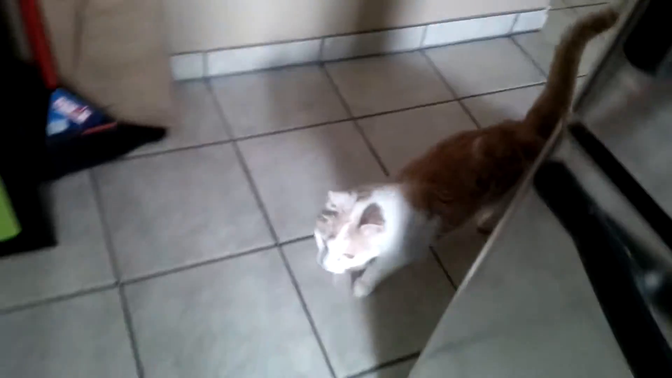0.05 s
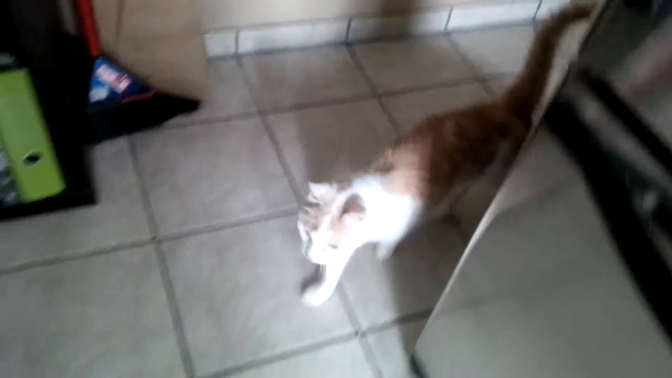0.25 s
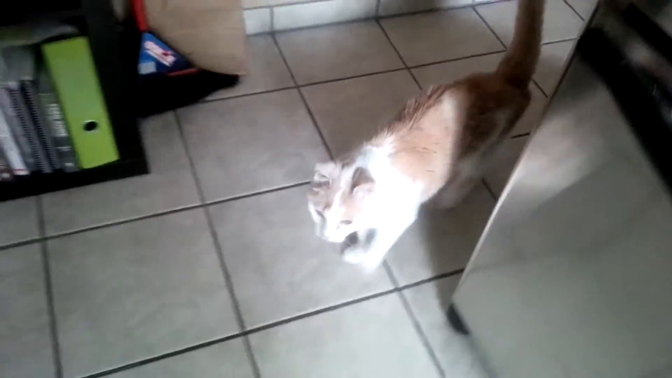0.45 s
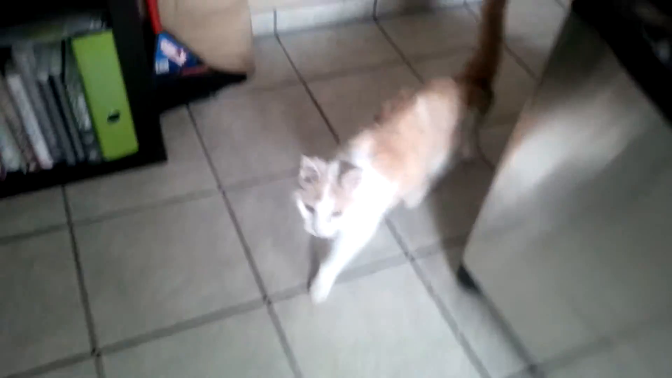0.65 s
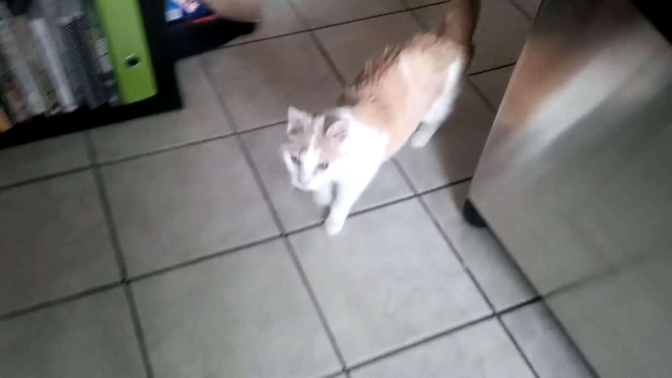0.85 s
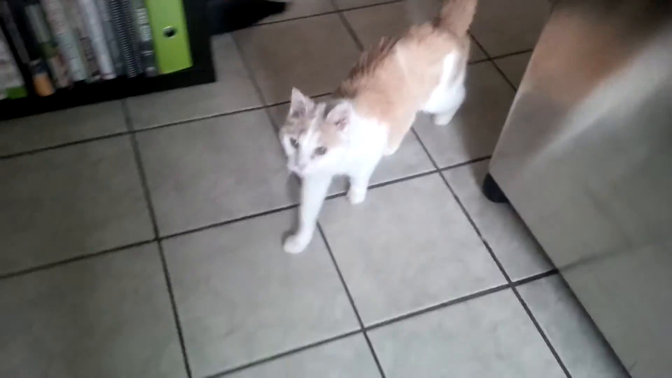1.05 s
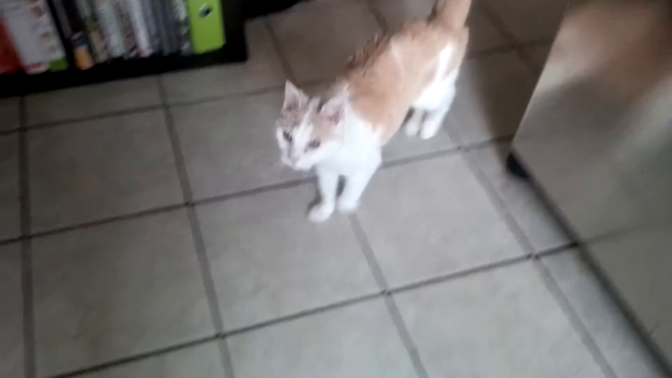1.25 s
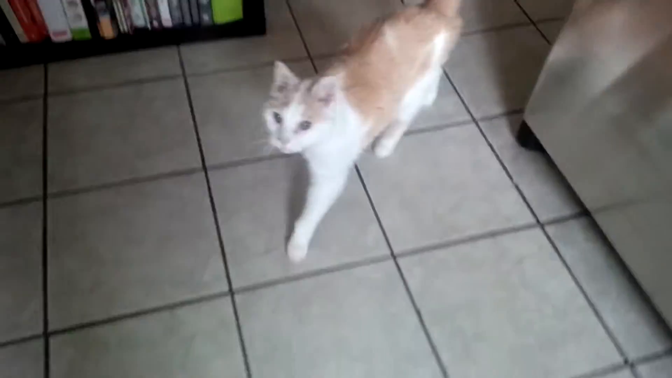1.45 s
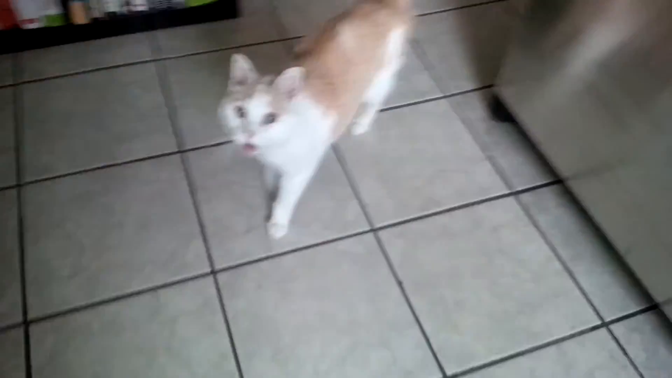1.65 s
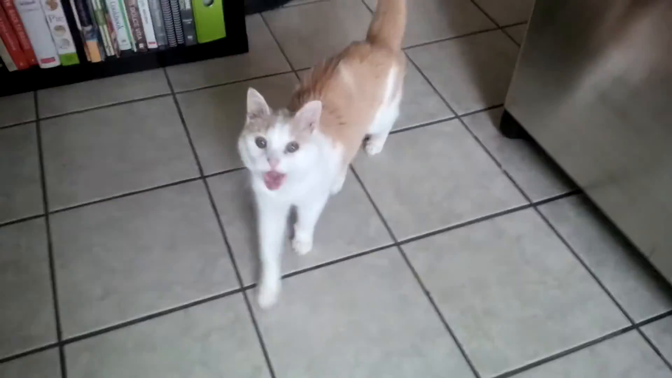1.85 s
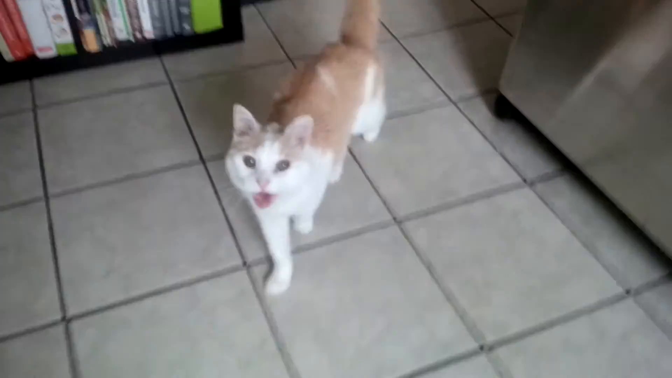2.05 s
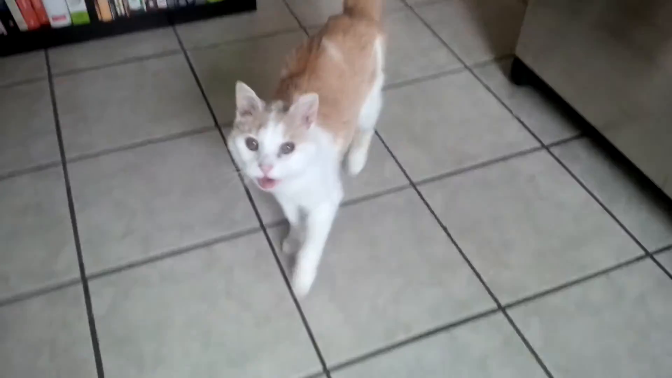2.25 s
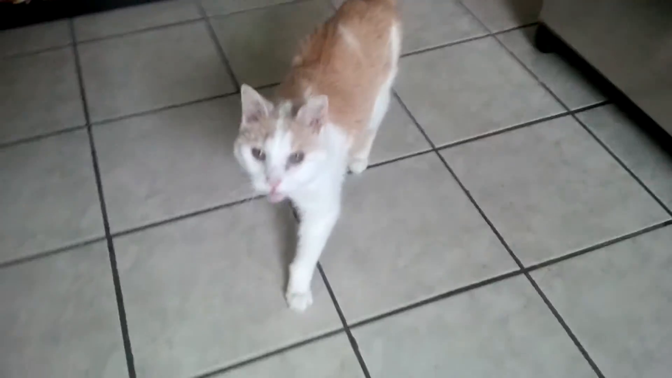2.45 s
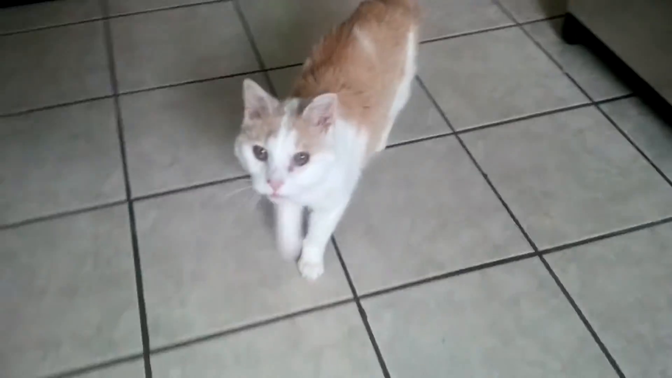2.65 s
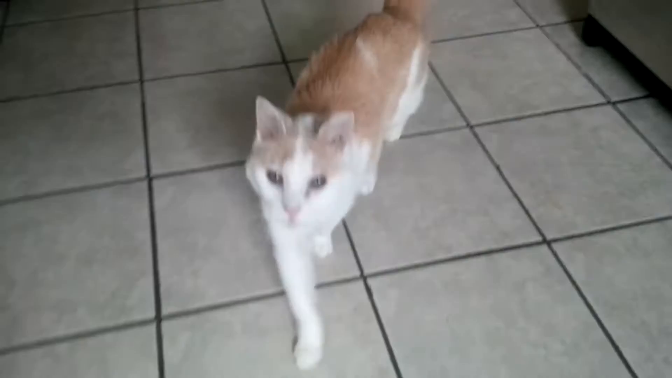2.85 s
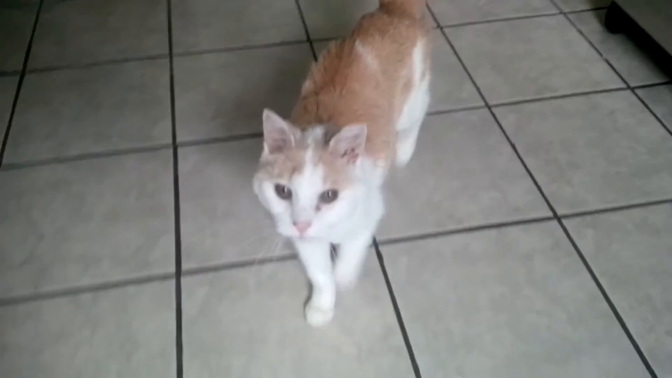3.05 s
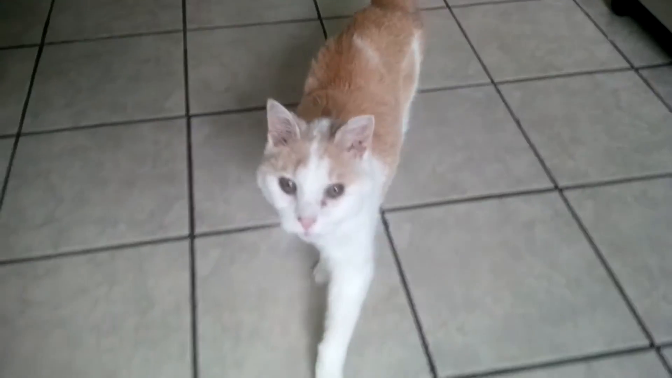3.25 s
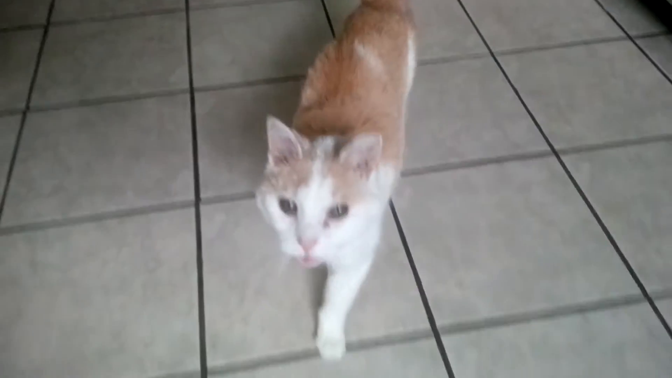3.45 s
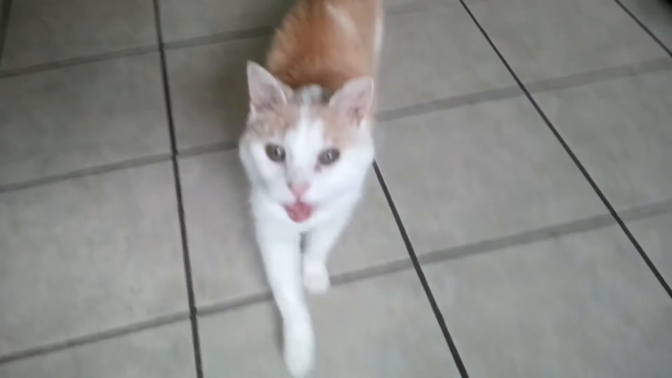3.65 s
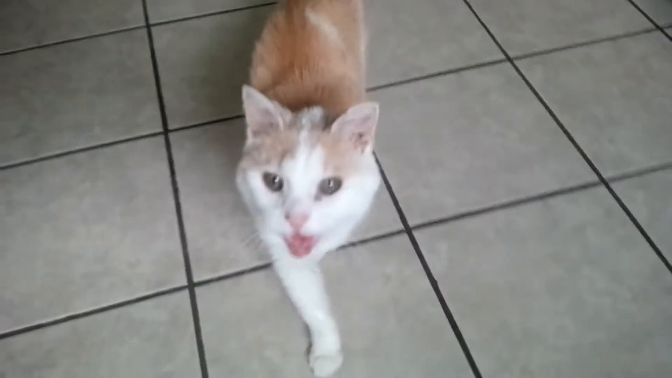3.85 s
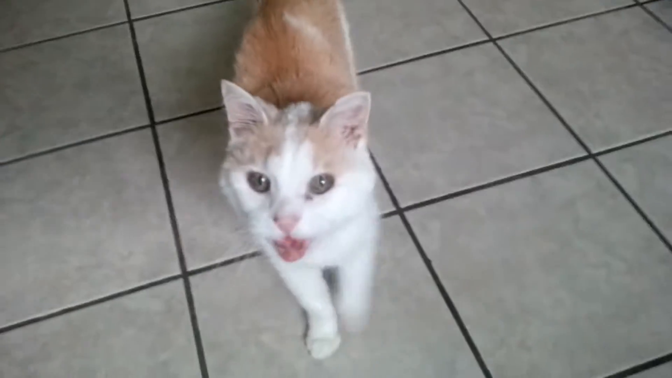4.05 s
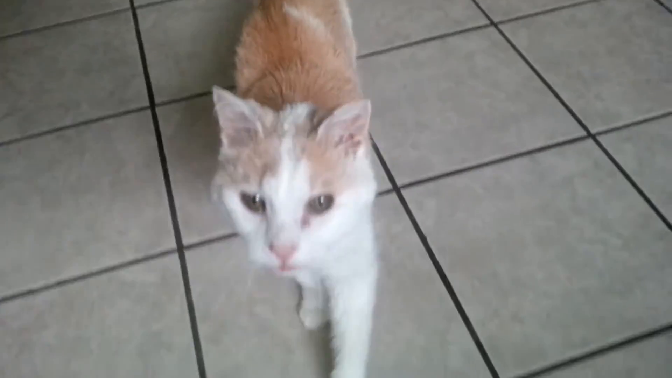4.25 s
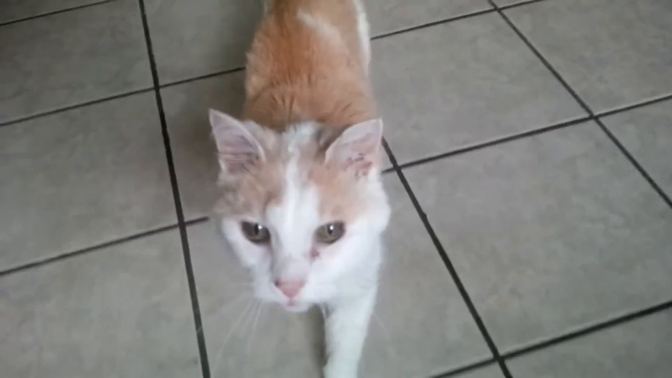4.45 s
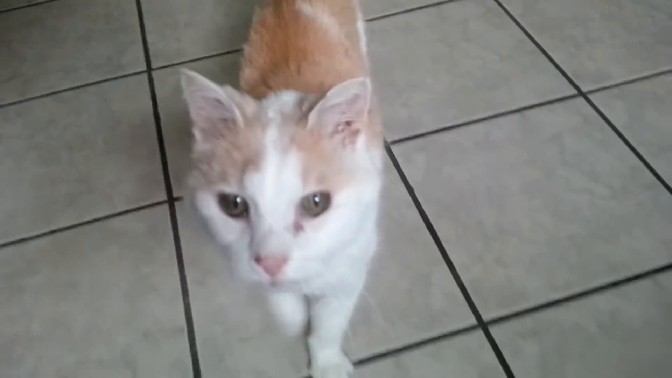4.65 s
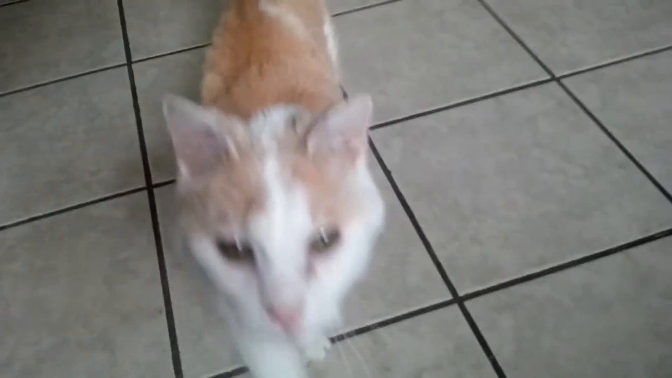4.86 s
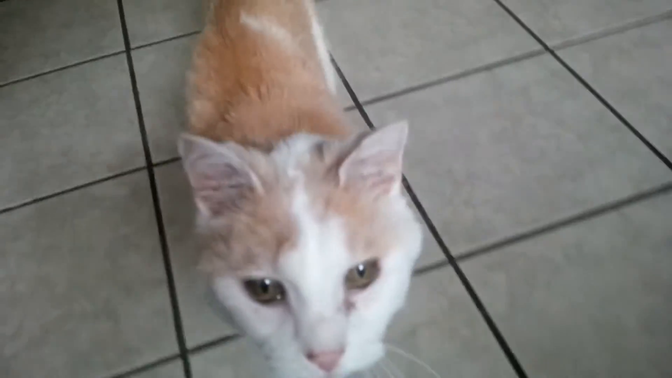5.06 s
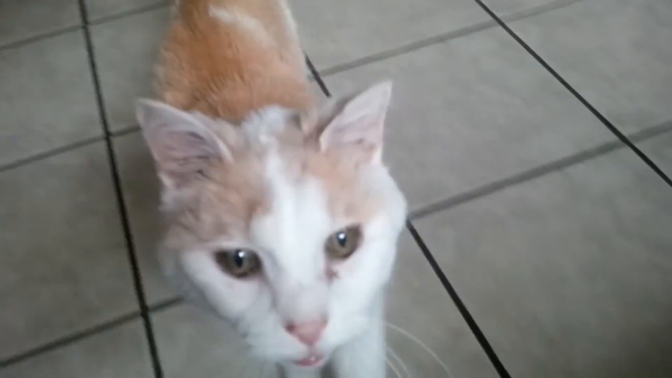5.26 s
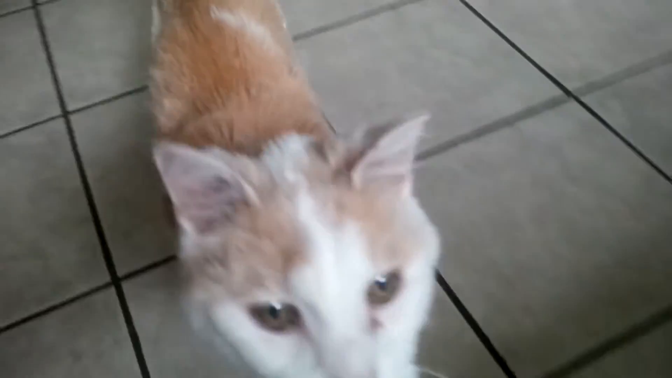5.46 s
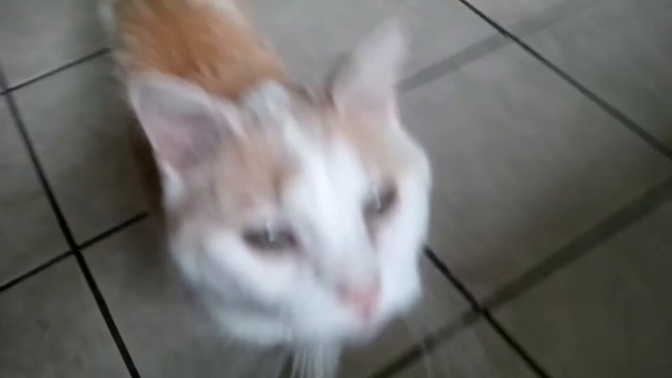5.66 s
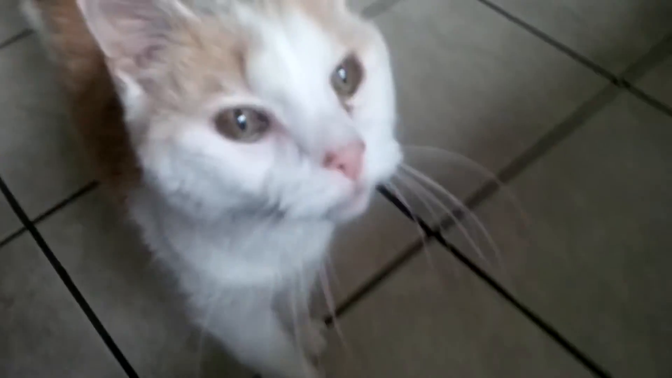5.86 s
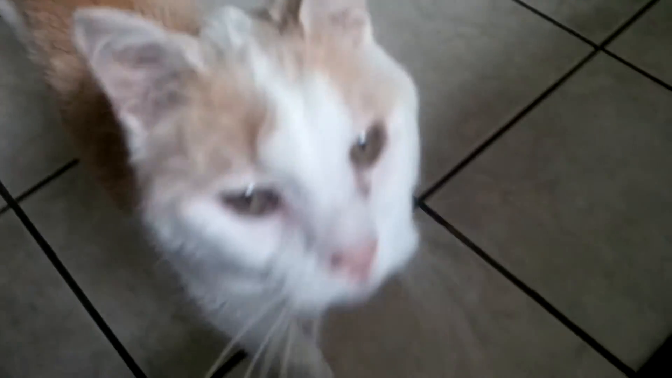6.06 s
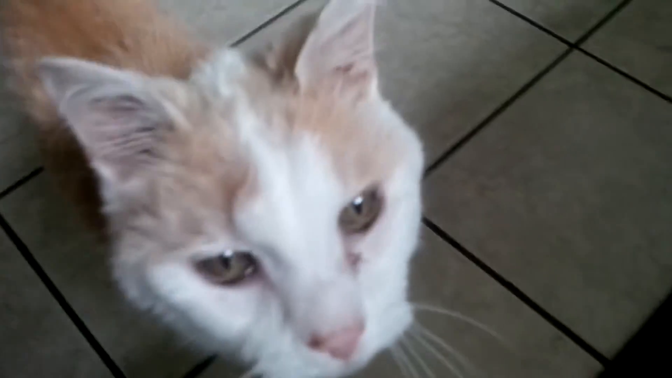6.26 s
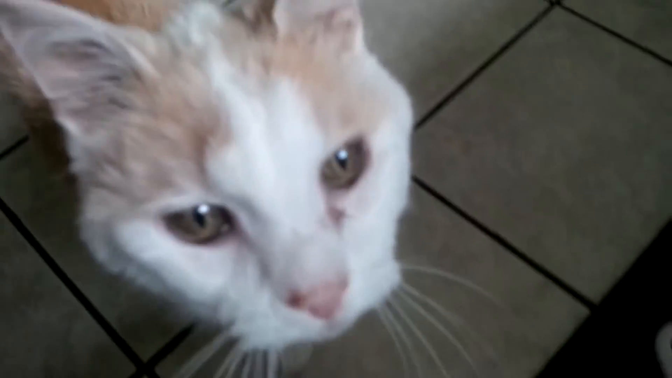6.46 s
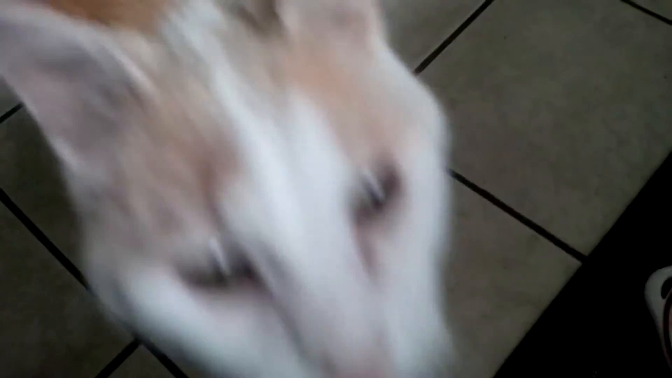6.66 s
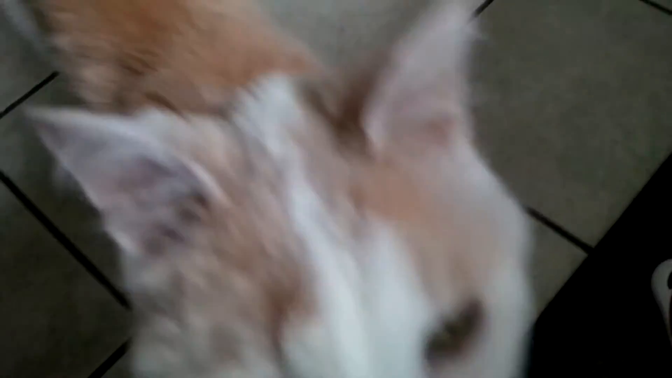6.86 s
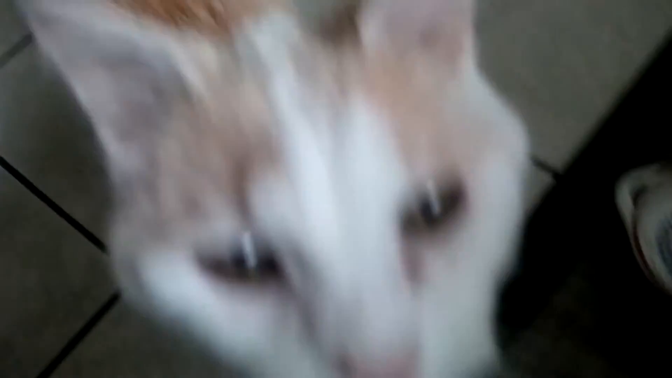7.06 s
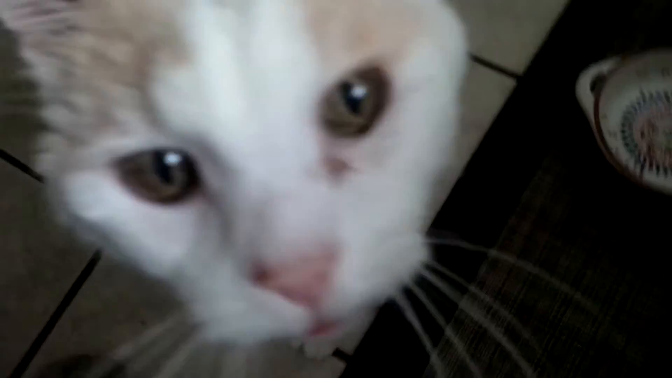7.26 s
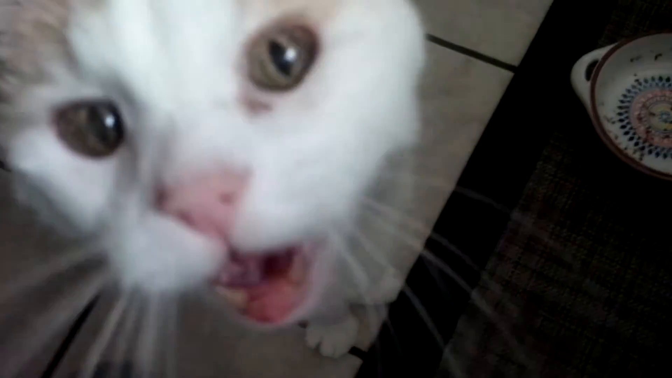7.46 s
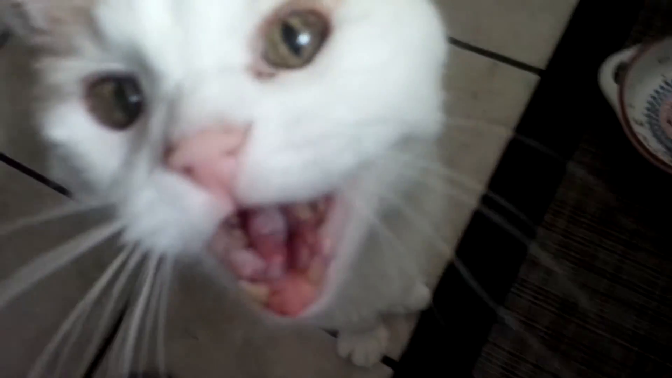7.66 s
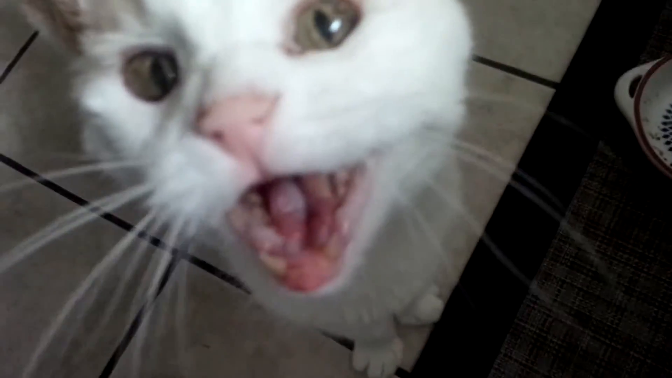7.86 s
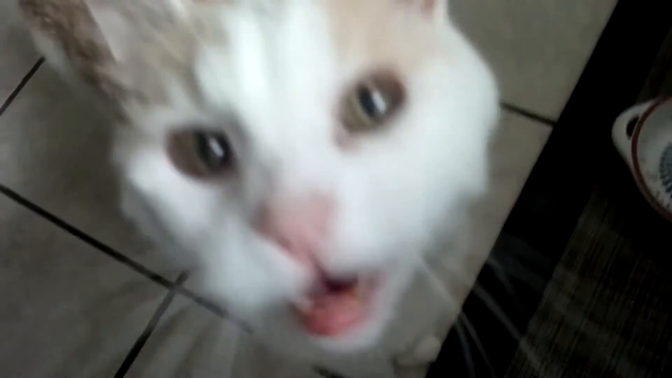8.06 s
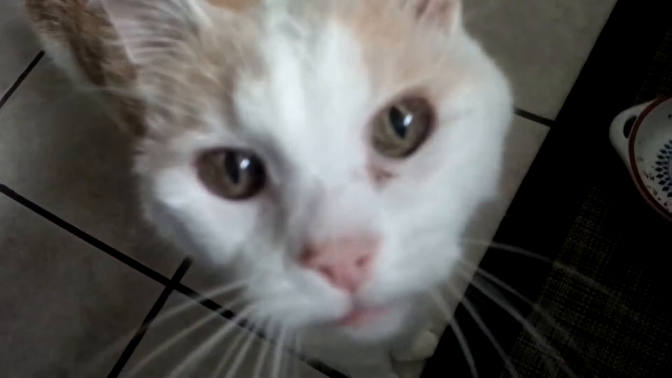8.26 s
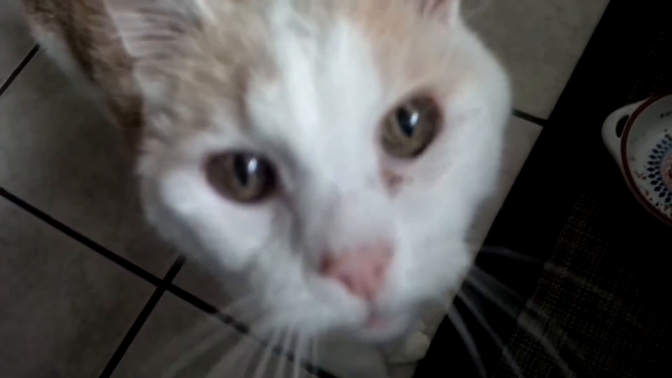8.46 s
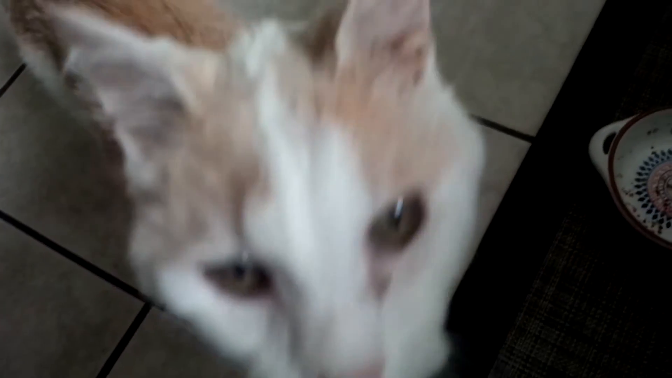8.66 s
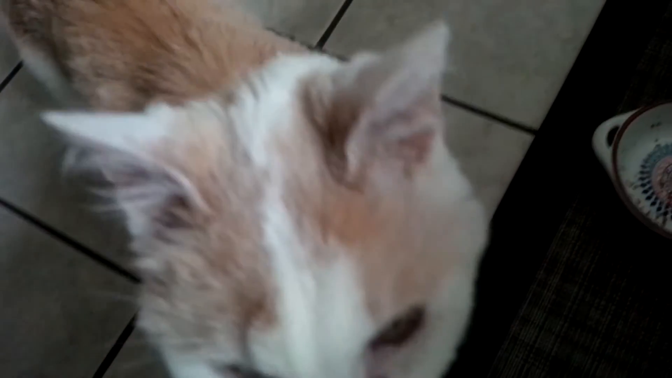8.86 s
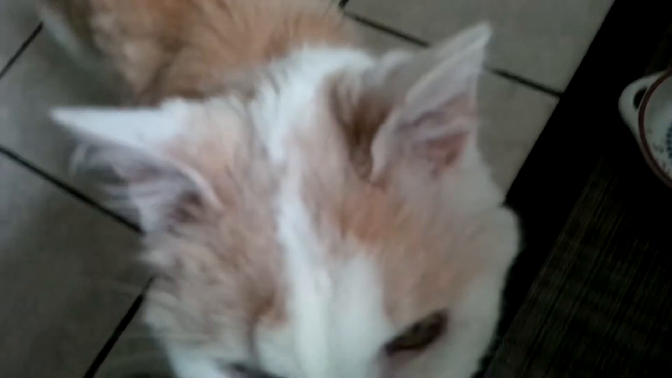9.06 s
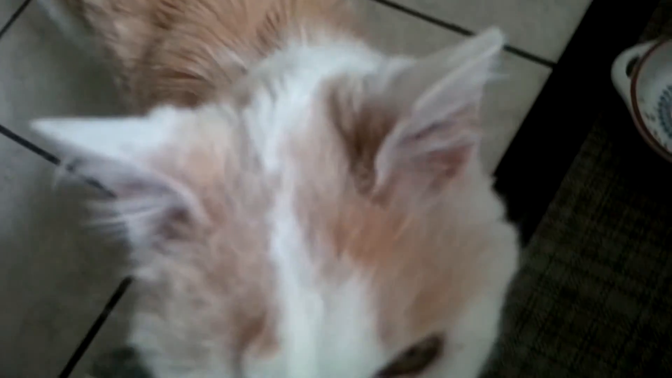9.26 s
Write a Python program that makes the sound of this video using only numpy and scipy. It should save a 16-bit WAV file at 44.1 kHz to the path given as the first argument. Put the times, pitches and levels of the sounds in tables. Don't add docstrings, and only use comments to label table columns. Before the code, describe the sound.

In a small, hard tiled room, a joint creaks in dry, sticking jerks for over a second. An old cat then meows five times, approaching from across the floor to right at the hand-held microphones. Each call begins as a gravelly closed-mouth trill and opens into a clearer tone; the last breaks off. Finger taps, scuffs, clicks and faint air hisses come between.

```python
import sys
import numpy as np
from scipy import signal
from scipy.fft import rfft, irfft, next_fast_len
from scipy.io import wavfile
from scipy.ndimage import map_coordinates

SR = 44100
rng = np.random.default_rng(int(sys.argv[2]) if len(sys.argv) > 2 else 0)


def wav_out(sig):
    wavfile.write(sys.argv[1], SR, np.round(np.clip(np.atleast_2d(sig).T, -1, 1) * 32767).astype(np.int16))


def invert_db(x):
    u = np.asarray(x, float) / 20
    return 10 ** u


N = 411012

# freq_hz, density_db
ROOM_TONE = [(15, -2.5), (35, -6), (80, -2), (140, -10), (250, -9.5), (500, -17), (1000, -19.5),
             (2000, -25), (4000, -32), (8000, -38.5), (12000, -42), (15000, -49)]
# freq_hz, likeness
PORT_LIKENESS = [(60, 0.87), (130, 0.94), (270, 0.69), (580, 0.41), (1220, 0.11), (2600, 0.05)]
# freq_hz, left_minus_right_db
HAND_SHADE = [(60, 4.5), (140, -14), (320, -3.5), (740, -7), (1130, -11), (1710, -17.5), (2600, -12),
              (4500, -9.5), (8000, -2.5), (13000, 1)]
# freq_hz, density_db
SHAKE_COLOUR = [(10, -15), (25, 8), (70, -10), (110, -3), (200, -54)]
# peak_s, rise_s, fall_s, level_db
HAND_JOLTS = [
    (0, .1, 0.41, -50.5),
    (0.521, 0.18, 2.3, -49.5),
    (3.24, .25, 1.5, -58.5),
    (4.26, 0.22, .15, -51),
    (5.298, 3.5, 1.1, -64.5),
    (7.202, 2.3, 0.44, -51.5),
]
# freq_hz, t60_s
TILE_DECAY = [(200, 0.16), (1500, 0.3), (3000, 0.38), (6000, 0.13), (12000, 0.031)]

# peak_s, rise_s, fall_s, body_db, rasp_over_body_db
SCUFFS = [(2.49, .05, 0.14, -47.5, -14.5), (1.47, .06, .15, -58, -7.5), (2.816, 0.0065, 0.046, -51, -2.5),
          (2.855, 0.036, 0.039, -56.5, -0.5), (2.899, 0.049, .12, -68, -9), (3.11, 0.11, 0.24, -58.5, -12),
          (4.21, 0.016, .06, -37, -10.5), (4.234, 0.021, .05, -46.5, -19), (4.4, 0.41, 0.16, -55.5, -10.5),
          (4.799, .3, .22, -52.5, -14), (5.57, 0.014, 0.055, -56.5, -8), (5.634, 0.022, 0.072, -48, -14),
          (6.999, 0.062, 0.096, -62.5, -12), (8.099, 0.017, 0.074, -36, -5.5),
          (8.154, 0.063, 0.043, -47, 1.5)]
# freq_hz, density_db
SCUFF_BODY = [(100, -27.5), (200, 1), (600, -0.5), (1500, -2.5), (2500, -8), (3500, -39)]
# freq_hz, density_db
SCUFF_RASP = [(1800, -27), (2800, 7.5), (3600, -3), (4600, 1), (5600, -7.5), (6500, -18.5), (8000, -35)]
# peak_s, rise_s, fall_s, level_db, centre_hz
HISSES = [(2.856, 0.049, 0.041, -59.5, 9600), (8.15, .03, .04, -49, 10700), (8.163, .03, .03, -49.5, 15000),
          (8.1, 0.05, 0.1, -58.5, 7400), (7.633, .02, .02, -51, 5400), (7.667, 0.016, .02, -47, 3100),
          (7.697, .015, .015, -56, 5200), (7.755, .015, .02, -50.5, 5000), (7.868, .015, .02, -52, 5000),
          (7.866, 0.011, .015, -45.5, 3000), (.49, .003, .005, -62, 4400), (.515, 0.027, 0.033, -67, 4400),
          (1.07, .02, .04, -66, 4100), (1.15, .04, 0.072, -58, 3330), (4.232, .02, .04, -68.5, 10000),
          (5.47, 0.067, 0.067, -60.5, 5640), (2.822, 0.013, .04, -61, 5150), (2.89, .07, 0.046, -66, 4400),
          (1.75, .09, .15, -59, 5200), (3.62, 0.071, 0.11, -58, 5300), (7.41, .07, .08, -64, 6700)]
# start_s, peak_db, ring_hz, knock_db
TAPS = [(1.553, -41, 310, 4), (1.687, -34.5, 334, -20), (1.712, -38, 330, -16.5), (1.725, -36, 324, -23.5),
        (1.77, -40.5, 201.5, -8.5), (1.823, -39.5, 307, -4), (1.882, -37.5, 420, -12),
        (2.127, -32, 327.6, -7), (2.334, -40, 201.2, 1), (2.674, -40.5, 303, -10.5), (2.814, -25, 297, -16),
        (2.825, -36, 345, -28), (2.831, -32, 360, -37), (2.861, -42.5, 319, -14), (3.042, -51, 326, -22.5),
        (3.514, -31, 450, -3), (3.756, -40.5, 380, -8), (3.843, -40, 421.4, -2.5), (3.993, -40.5, 403, -22),
        (4.079, -40, 372, -4), (4.102, -42, 372, 6), (4.198, -37.5, 325, -1.5), (4.237, -38, 311, 1),
        (4.396, -43.5, 247, -15), (5.647, -49, 281, -3.5), (6.022, -50.5, 304, -7.5),
        (8.588, -44, 436, -4.5), (8.897, -49, 357, -4), (5.52, -42.5, 202, -22.5), (2.841, -39, 355, -20),
        (2.006, -43.5, 431, -14.5), (2.168, -40.5, 427, -8.5), (3.65, -42, 348, -13)]
# start_s, peak_db, centre_hz
CLICKS = [(1.551, -47, 5600), (1.7148, -68, 7000), (2.131, -56.5, 7340), (2.6763, -63, 2400),
          (3.514, -51, 4280), (3.6647, -59.5, 7150), (4.2228, -51, 7240), (4.2429, -46.5, 5800),
          (4.401, -54, 4460), (5.646, -61, 4700), (6.996, -57, 1890), (7.224, -56.5, 3400),
          (8.466, -71, 4340), (8.4895, -77, 4440), (8.5298, -72, 3820), (8.8972, -66, 3570),
          (8.97, -64, 4800), (8.592, -56.5, 1480), (3.312, -75, 3960), (9.016, -72, 4500)]

# start_s, peak_db, low_db
JOINT_SLIPS = [(0.029, -41.5, -5), (0.056, -40.5, 0), (0.079, -39, -6.5), (0.104, -41, -3),
               (0.138, -41, -2.5), (0.228, -40.5, -3), (0.308, -40, -3.5), (0.354, -38.5, -3),
               (0.388, -39, 0), (0.4236, -40, -4), (0.454, -38.5, -5.5), (0.474, -38.5, -6),
               (0.489, -42, 1), (0.503, -38.5, -11), (0.513, -43, -6), (0.520, -37, -14), (0.528, -40, -6),
               (0.541, -44, -4), (0.549, -47, -1), (0.556, -53, -11), (0.566, -50, -4), (0.712, -43, -4.5),
               (0.723, -38.5, -7), (0.761, -33.5, -8), (0.807, -34.5, -4), (0.867, -34.5, -7),
               (0.941, -42.5, -3.5), (1.044, -31, -8), (1.1, -33, -22), (1.136, -34.5, -7),
               (1.157, -35, -6), (1.172, -36, -13), (1.249, -46, -9), (1.291, -41.5, -22),
               (1.325, -48, -12)]
# peak_s, rise_s, fall_s, level_db
JOINT_PUSHES = [
    (.548, .3, 0.075, -53),
    (.868, 0.48, 0.19, -48.5),
    (1.046, 0.0068, 0.9, -50.5),
]
# freq_hz, width_hz, level_db
JOINT_MODES = [(933, 370, 4.5), (1240, 612, 11.5), (1454, 753, 10.5), (2450, 620, -1.5), (3000, 500, -3.5)]
# freq_hz, width_hz, level_db
FRAME_MODES = [(138, 59, 3.5), (276, 267, 2.5), (450, 220, -14)]

# freq_hz, width_hz, level_db
THROAT_MODES = [(692, 210, 6)]
# freq_hz, width_hz, level_db
EDGE_MODES = [(3270, 380, 6), (5600, 1300, 1.5)]
# mouth_hz, throat_db, mouth_db, edge_db
JAW = [(950, -5.5, -6, -66.5), (1120, 1, -7, -53), (1440, -3, -0.5, -32.5), (1510, -6, -2, -27),
       (1850, -7.5, -4, -25)]
# time_s, pitch_hz, effort_db, mouth_hz (rises as the jaw opens)
FIRST_CALL = [(1.419, 305, -60, 1100), (1.49, 272.3, -60, 1130), (1.61, 298.4, -44.5, 1093),
              (1.719, 352.3, -33, 1510), (1.839, 384.9, -31.5, 1910), (2.041, 392.3, -22.5, 1820),
              (2.332, 370.8, -25, 1481), (2.499, 357.1, -49.5, 1450), (2.56, 365, -65.5, 1400)]
SECOND_CALL = [(3.25, 278, -68.5, 1100), (3.4, 290.1, -43, 1240), (3.58, 328.6, -35.5, 1300),
               (3.655, 377.6, -34, 1850), (3.868, 389.2, -26.5, 1845), (4.019, 385.4, -24.5, 1673),
               (4.137, 371.4, -26.5, 1490), (4.201, 341.4, -40.5, 1390), (4.298, 345, -60, 1387)]
THIRD_CALL = [(5.05, 269, -53.5, 1000), (5.088, 286.2, -48, 1090), (5.171, 295.1, -42.5, 1130),
              (5.23, 299.4, -39, 1433), (5.36, 310.6, -37, 1462), (5.478, 310.5, -39.5, 1560),
              (5.539, 301.2, -64, 1480)]
FOURTH_CALL = [(7.102, 261, -54, 950), (7.173, 305.6, -41.5, 984), (7.209, 250.6, -47, 1030),
               (7.509, 313.6, -28, 1576), (7.707, 357.5, -23.5, 1700), (7.993, 369.9, -21, 1763),
               (8.059, 351.8, -30, 1510), (8.094, 299.2, -35.5, 1430), (8.131, 315, -62.5, 1333)]
FIFTH_CALL = [(8.946, 339.7, -51.5, 980), (8.967, 310.7, -47.5, 987), (9.05, 306.3, -38, 980),
              (9.109, 302.8, -27, 970), (9.199, 316.2, -33.5, 1063), (9.26, 326, -33, 1456),
              (9.34, 341.8, -29, 1422)]
# time_s, front_cavity_hz, front_db, palate_ring_hz, palate_db
TONGUES = [
    [(1.42, 2040, -25, 4030, -55), (1.63, 1940, -17, 4040, -41), (1.69, 2382, -16.5, 4520, -27),
     (1.78, 2950, -23.5, 4960, -34.5), (1.93, 3160, -20.5, 4830, -37), (2.06, 2611, -23.5, 4950, -29),
     (2.28, 2630, -33.5, 4590, -32), (2.35, 2500, -12.5, 4720, -35), (2.52, 2310, -36, 4780, -32)],
    [(3.25, 1690, -33, 4300, -48), (3.4, 1850, -18.5, 4350, -49), (3.46, 1930, -17, 4300, -36.5),
     (3.54, 2190, -13, 4530, -32), (3.6, 2500, -19, 4960, -28), (3.71, 2780, -16.5, 4900, -44),
     (3.87, 2510, -17.5, 4780, -34.5), (4.12, 2425, -22, 4790, -36), (4.3, 2400, -22, 4700, -25)],
    [(5.05, 2480, -25, 4600, -40), (5.17, 1980, -32, 4600, -59), (5.23, 1850, -9, 4600, -48.5),
     (5.26, 2100, -15, 4730, -30), (5.36, 2100, -16, 4640, -27), (5.46, 2155, -16.5, 4900, -27),
     (5.54, 2000, -16, 4980, -20)],
    [(7.1, 1530, -21, 3530, -33.5), (7.24, 1590, -14, 3400, -30), (7.33, 1890, -16.5, 3500, -37),
     (7.4, 2170, -12.5, 5040, -34), (7.54, 2450, -16, 4660, -27.5), (7.62, 2700, -10, 4770, -28),
     (7.72, 2680, -21, 4920, -38.5), (7.96, 2738, -15, 5000, -32), (8.1, 2450, -13, 4930, -22)],
    [(8.95, 1480, -24.5, 4800, -45), (9.05, 1490, -21.5, 4570, -62.5), (9.09, 1510, -17, 4600, -50.5),
     (9.13, 1670, -23.5, 4260, -37), (9.17, 1940, -28, 4050, -43.5), (9.22, 2070, -22, 4190, -23),
     (9.25, 2200, -18.5, 4740, -24), (9.32, 2215, -22.5, 4700, -25.5)],
]
# crest_s, rate_hz (at that crest), slowing_hz_per_s
TRILLS = [(1.621, 32.98, 3.02), (3.445, 32.93, 8.2), (5.318, 33.24, 2.9), (7.498, 30.45, 17),
          (9.185, 32.3, 25.7)]
# throb_db (per % of swing), widest_swing_percent, clear_hz (tone clears above this pitch)
LARYNXES = [(1, 4, 371), (1.6, 6, 379), (.6, 7.5, 370), (1, 6.5, 359), (1.5, 6, 370)]
LIP_LEAKS = [0, 0, -5, -11, -9]
# fundamental_db, throat_db, top_treble_db, room_db
PLACES = [
    (-58.5, 0, -22.5, -9),
    (-57.5, 0, -27.5, -9.5),
    (-46.5, 2, -11, -12),
    (-41.5, 2, 3, -13),
    (-47, -4, 1, -9.5),
]
# edge_db, lower_mouth_db
FACINGS = [(-6, -10.5), (0, -8), (-4, -10.5), (4, -7.5), (7, -4)]
TOPS = [6540, 6300, 6500, 9250, 6700]
THROAT_THROBS = [.5, .7, 1.7, .3, .4]
# centre_s, added_swing_percent, length_s
CRACKS = [
    (1.8, 1.2, .05),
    (2.48, 6, .05),
    (3.64, 1.5, .03),
    (4.21, 3, .03),
    (7.755, 1.3, .012),
    (7.868, 1.8, .012),
]
# centre_s, level_db, length_s
CATCHES = [(3.445, 4, 0.013), (3.61, -4.5, .025), (4, -4, .008), (5.066, -3, .01), (5.098, -3.5, .008),
           (2, -3, .02), (2.108, 4, 0.0067), (2.15, -2, 0.022), (2.296, -1, 0.0061), (2.329, 3, .025),
           (2.17, -1.5, .04), (4.023, 2, .04), (7.988, -1.5, .03), (4.153, 4.5, 0.0052),
           (5.361, 6.5, 0.003), (5.366, 3.5, 0.0034), (7.167, -21, 0.018), (7.618, -4.5, 0.016),
           (2.099, -4.5, 0.0076), (2.311, 0, .01), (2.373, -6.5, 0.017), (8.058, 5.5, 0.0042),
           (9.037, -20, 0.01), (9.095, 5.5, 0.014)]
# centre_s, lower_mouth_db, throat_db, fundamental_db, length_s
VOICE_SHIFTS = [(1.51, -3, 2.5, 7, 0.079), (2.12, -6, 2, -6.5, 0.047), (2.357, -6.5, -1.5, -2, 0.066),
                (3.36, -11, -1, 2, 0.11), (5.103, -2, -3, -3, 0.075), (7.932, -1.5, 1, -2, 0.089),
                (1.79, -0.5, 8.5, -12, 0.054), (2.006, -1, -3.5, -3, 0.14), (2.253, -3, -3.5, -6, .08),
                (2.471, -3.5, 4, -5, .08), (3.5, -3.5, 1, -9, .08), (3.693, 4.5, 8, -1, 0.076),
                (3.9, 1.5, -2.5, 1.5, 0.22), (4.154, -10, -0.5, -1, 0.051), (5.295, -8, 1.5, -2, .1),
                (7.299, -1, 1.5, 3.5, .06), (7.428, 3, 1, 0.5, 0.068), (7.577, 3.5, 0, -1.5, 0.11),
                (7.716, -8.5, 6, -1, 0.051), (7.822, -0.5, 2, 0.5, 0.079), (8.026, -2, 5.5, -2.5, 0.036),
                (9.251, 3, -1.5, -3, 0.039)]


def unit(x):
    return x / np.sqrt(np.mean(np.abs(x) ** 2) + 1e-20)


def along(points, hz):
    f, v = np.transpose(points)
    return np.interp(np.log(hz + 1), np.log(f + 1), v)


def curves(rows, t):
    s, *cols = np.transpose(rows)
    return [np.interp(t, s, c) for c in cols]


def wobble(rate, size):
    knots = rng.standard_normal(int(size * rate / SR) + 4)
    return map_coordinates(knots, [np.arange(size) * rate / SR])


def moment(t, s, length_s):
    return np.exp(-((t - s) / length_s) ** 2)


def stroke(t, s, rise_s, fall_s):
    return -20 * np.where(t < s, (s - t) / rise_s, (t - s) / fall_s)


def filtered(x, response):
    m = next_fast_len(x.shape[-1] + 8192)
    return irfft(rfft(x, m) * response(np.fft.rfftfreq(m, 1 / SR)), m)[..., :x.shape[-1]]


def modes(table, f):
    return sum((-1) ** k * invert_db(db) * 1j * f * w / (c * c - f * f + 1j * f * w)
               for k, (c, w, db) in enumerate(table))


def noise(spectrum):
    return unit(filtered(rng.standard_normal(N), lambda hz: invert_db(along(spectrum, hz))))


def add(out, x, s):
    part = out[..., round(s * SR):][..., :x.shape[-1]]
    part += x[..., :part.shape[-1]]


def room(x):
    hz, t, z = signal.stft(rng.standard_normal((2, 2 * SR // 5)), SR, nperseg=256)
    decay = invert_db(-60 * t / along(TILE_DECAY, hz)[:, None])
    tail = signal.istft(z * decay, SR, nperseg=256)[1]
    tail[1] = 1.3 * tail[0] + .7 * tail[1]
    late = np.pad(x, (200, 0))[None]
    return signal.fftconvolve(late, tail / np.linalg.norm(tail[0]), axes=1)


def ports(x, shade):
    lag_s = 2.5e-5

    def response(hz):
        left = invert_db(shade * along(HAND_SHADE, hz))
        return 2 / (1 + left) * np.array([left * np.exp(-2j * np.pi * hz * lag_s), 1 + 0 * hz])
    return filtered(x, response)


def room_tone():
    turn = lambda hz: np.arccos(np.clip(along(PORT_LIKENESS, hz), -1, 1)) / 2
    mid = filtered(noise(ROOM_TONE), lambda hz: np.cos(turn(hz)))
    side = filtered(noise(ROOM_TONE), lambda hz: np.sin(turn(hz)))
    drift = invert_db(0.38 * wobble(1.0, size=N))
    return invert_db(-63) / np.std(mid) * np.array([mid + side, mid - side]) * drift


def hand_shake():
    t = np.arange(N) / SR
    hand = invert_db(-60) + sum(invert_db(db + stroke(t, *jolt)) for *jolt, db in HAND_JOLTS)
    opposed = np.array([[1], [-1]]) * noise(SHAKE_COLOUR)
    return invert_db(-11.5) * hand * (noise(SHAKE_COLOUR) + .35 * opposed)


def scuffs():
    t, out = np.arange(N) / SR, np.zeros(N)
    body, rasp = [unit(noise(colour) * invert_db(1.5 * wobble(90, size=N))) for colour in (SCUFF_BODY, SCUFF_RASP)]
    for s, rise_s, fall_s, db, rasp_db in SCUFFS:
        on = (t > s - 2 * rise_s) & (t < s + 2 * fall_s)
        level = invert_db(db - 4.0 + stroke(t[on], s, rise_s, fall_s))
        out[on] += level * (body[on] + invert_db(rasp_db) * rasp[on])
    return ports(out, shade=0.56)


def hisses():
    t, out = np.arange(N) / SR, np.zeros(N)
    for s, rise_s, fall_s, db, hz in HISSES:
        on = (t > s - 2 * rise_s) & (t < s + 2 * fall_s)
        jet = filtered(rng.standard_normal(on.sum()), lambda f: modes([(hz, 0.23 * hz, 0)], f) ** 2)
        out[on] += invert_db(db + stroke(t[on], s, rise_s, fall_s)) * unit(jet)
    return ports(out, shade=0.56)


def taps():
    out, t = np.zeros(N), np.arange(SR // 20) / SR
    onset = 1 - np.exp(-t / 0.0038)
    for s, db, hz, knock_db in TAPS:
        ring = np.sin(2 * np.pi * hz * t) * invert_db(-60 * t / 0.015)
        knock = np.sin(2 * np.pi * 2.1 * hz * t) + 1.4 * np.sin(2 * np.pi * 1.8 * hz * t)
        knock *= invert_db(knock_db - 60 * t / 0.012)
        add(out, invert_db(db + 17.0) * (ring + knock) * onset, s + .002)
    return ports(out, shade=0.38)


def clicks():
    out, t = np.zeros(N), np.arange(SR // 20) / SR
    for s, db, hz in CLICKS:
        burst = rng.standard_normal(len(t)) * invert_db(-60 * t / 0.018) * (1 - np.exp(-t / 0.00073))
        click = filtered(burst, lambda f: modes([(hz, 0.33 * hz, 0)], f) ** 3)
        add(out, invert_db(db + 5.5) * click / np.abs(click).max(), s)
    return ports(out, shade=0.38)


def creak():
    slips, thuds, t = np.zeros(N), np.zeros(N), np.arange(SR // 5) / SR
    for s, db, low_db in JOINT_SLIPS:
        knock = .045 * rng.standard_normal(len(t)) * invert_db(-60 * t / .09)
        knock[0] = 1
        add(slips, invert_db(db + 26) * knock, s)
        add(thuds, invert_db(db + low_db + 33.5) * knock, s)

    t = np.arange(3 * SR // 2) / SR
    small = unit((rng.random(len(t)) < 150 / SR) * rng.standard_normal(len(t)))
    small *= sum(invert_db(db + stroke(t, *push)) for *push, db in JOINT_PUSHES) * (t < 1.44)
    add(slips, invert_db(-1) * small, 0)
    add(thuds, invert_db(14.5) * small, 0)

    joint = filtered(slips, lambda f: modes(JOINT_MODES, f) / (1 + 1j * f / 3600) ** 5)
    frame = filtered(thuds, lambda f: modes(FRAME_MODES, f) / (1 + 1j * f / 1500) ** 2)
    direct = joint + frame
    out = ports(direct, shade=0.67)
    for i, part in enumerate(np.split(direct[:len(t)], 3)):
        add(out, invert_db(-7) * invert_db([[-2.2], [1.8]]) * room(part), i / 2)
    return out


def tract(f, near_db, top_hz, mouth_hz, front_hz, palate_hz, *levels_db):
    below = lambda hz: 1 / (1 + (f / hz) ** 8)
    above = lambda hz: 1 / (1 + (hz / f) ** 8)
    chest = modes([(317, 560, 0)], f) * below(410)
    throat = modes(THROAT_MODES, f) ** 2 * below(820)
    lower = modes([(0.59 * mouth_hz, 420, 0)], f) * below(0.79 * mouth_hz) * above(810)
    mouth = modes([(mouth_hz, 0.12 * mouth_hz - 20, 0)], f)
    mouth = mouth * below(1.265 * mouth_hz) ** 2 * above(0.6 * mouth_hz)
    front = modes([(front_hz, 450, 0)], f) ** 2 * below(front_hz + 900) * above(front_hz - 450)
    edge = modes(EDGE_MODES, f) * above(3300) * (below(5900) ** 2 + invert_db(near_db) * below(9500) ** 2)
    palate_width_hz = 280 + 1.9 * np.maximum(mouth_hz - 1450, 0)
    palate = modes([(palate_hz, palate_width_hz, 0)], f) ** 2
    even = lambda part: part / np.sqrt(np.sum(np.abs(part) ** 2, axis=0))
    top = invert_db(-30) + 1 / (1 + (f / top_hz) ** 30)
    parts = (chest, -throat, -lower, mouth, -front, edge, -palate)
    return top * sum(invert_db(db) * even(part) for db, part in zip(levels_db, parts))


def overtones(t, hz, near_db, shape):
    step = np.arange(0, len(t), 64)
    k = np.arange(1, 26)[:, None]
    gain = tract(k * hz[step], near_db, *[c[step] for c in shape])
    waver = [wobble(14 * 64, size=len(step)) for _ in k]
    gain *= invert_db(np.clip(.35 * (k - 4), .5, 2.6) * waver)
    phase = 2 * np.pi * np.cumsum(hz) / SR
    tone = sum(np.real(np.interp(t, t[step], g) * np.exp(1j * n * phase)) for n, g in zip(k[:, 0], gain))
    return np.sqrt(2) * tone, phase


def leaking_breath(phase, near_db, shape, breath_db):
    puffs = rng.standard_normal(len(phase)) * (1 + 0.071 * np.cos(phase))
    f, frames, z = signal.stft(puffs, SR, nperseg=512)
    at = np.clip((frames * SR).astype(int), 0, len(phase) - 1)
    z *= np.abs(tract(f[:, None] + 1, near_db, *[c[at] for c in shape])) * invert_db(breath_db[at] + 23.5)
    z *= 1 + (f[:, None] / 1500) ** 2
    return signal.istft(z, SR, nperseg=512)[1][:len(phase)]


def meow(rows, tongue, trill, larynx, leak_db, place, facing, top_hz, deep):
    crest_s, trill_hz, slowing = trill
    throb_db, widest, clear_hz = larynx
    chest_db, throat_db, near_db = place
    edge_db, lower_db = facing
    t = np.arange(rows[0][0], rows[-1][0], 1 / SR)
    pitch_hz, effort_db, mouth_hz = curves(rows, t)

    slack = 1 - np.exp(-np.maximum(clear_hz - pitch_hz, 0) / 33)
    swing = .3 + widest * slack + sum(more * moment(t, s, length) for s, more, length in CRACKS)
    turn = 2 * np.pi * (trill_hz - slowing * (t - crest_s) / 2) * (t - crest_s)
    turn = turn + .12 * wobble(12, size=len(t))
    trilled = np.cos(turn) + .3 * np.sin(2 * turn)
    trilled *= 1 + .25 * wobble(25, size=len(t))
    jitter = (.15 + .09 * swing) * wobble(160, size=len(t))
    hz = pitch_hz * (1 + (swing * trilled + jitter) / 100)
    beats = np.cos(turn - .1) - .2 * np.cos(2 * turn - .2)
    throb = np.minimum(swing, 4) * throb_db * beats

    throat, mouth, edge = curves(JAW, mouth_hz)
    front_hz, front, palate_hz, palate = curves(tongue, t)
    lower, forward, hum = sum(np.outer(dbs, moment(t, s, length)) for s, *dbs, length in VOICE_SHIFTS)
    half = len(t) // 2
    sinking = t > t[half + np.argmax(pitch_hz[half:])]
    throat = throat + throat_db - 8.5 * (1 - slack) ** 2
    throat += 7 * np.sqrt(slack) * sinking
    shape = [
        np.minimum(top_hz, 5.1 * np.maximum.accumulate(mouth_hz)),
        mouth_hz, front_hz, palate_hz,
        np.minimum(chest_db, effort_db + 7) + hum + 0.47 * deep * throb,
        effort_db + throat + forward + deep * throb,
        effort_db + mouth + lower_db + 2.0 + lower + .45 * throb,
        effort_db + throb + mouth,
        effort_db + throb + front,
        effort_db + edge + edge_db + .5 * throb,
        effort_db + throb + palate]

    tone, phase = overtones(t, hz, near_db, shape)
    tone *= invert_db(swing * .13 * wobble(70, size=len(t)))
    tone *= invert_db(sum(db * moment(t, s, length) for s, db, length in CATCHES))
    breath_db = -32.5 + leak_db + 6.8 * np.sqrt(swing)
    breath = leaking_breath(phase, near_db, shape, breath_db)
    breath = breath * invert_db(.3 * swing * (np.cos(turn) - .3))
    return -(tone + breath) * signal.windows.tukey(len(t), .04)


def cat():
    out = np.zeros((2, N))
    calls = (FIRST_CALL, SECOND_CALL, THIRD_CALL, FOURTH_CALL, FIFTH_CALL)
    settings = zip(calls, TONGUES, TRILLS, LARYNXES, LIP_LEAKS, PLACES, FACINGS, TOPS, THROAT_THROBS)
    for rows, tongue, trill, larynx, leak_db, (*place, room_db), facing, top_hz, deep in settings:
        voice = meow(rows, tongue, trill, larynx, leak_db, place, facing, top_hz, deep)
        add(out, ports(voice, shade=0.91), rows[0][0])
        add(out, invert_db(room_db) * invert_db([[-3], [2]]) * room(voice), rows[0][0])
    return out


def scene():
    background = room_tone() + hand_shake()
    handling = scuffs() + hisses() + taps() + clicks()
    return background + handling + creak() + cat()


def band_limit(x):
    return signal.sosfilt(signal.butter(12, 14300, fs=SR, output="sos"), x)


def record(dry):
    return band_limit(dry)


dry = scene()
out = record(dry)
wav_out(out)
```